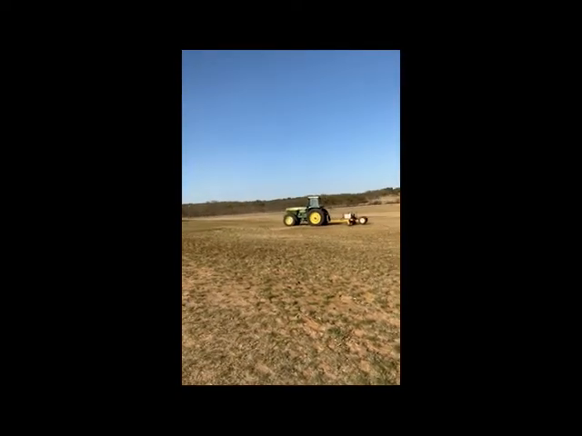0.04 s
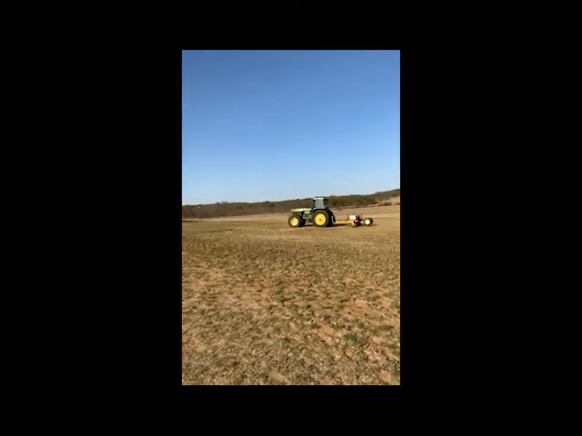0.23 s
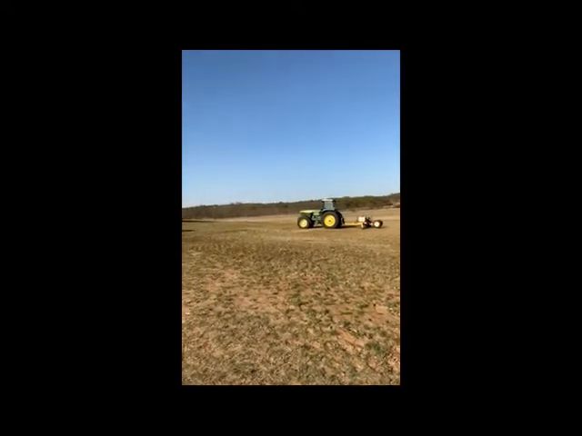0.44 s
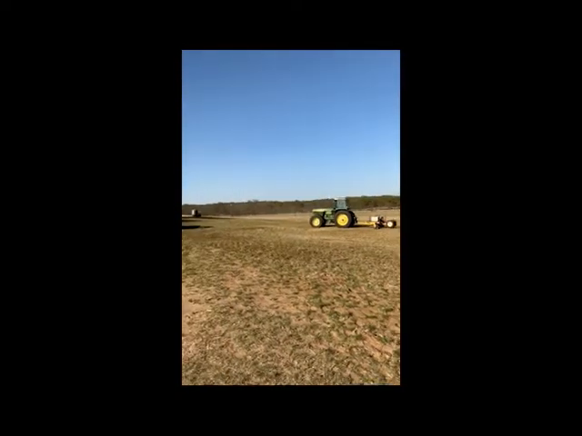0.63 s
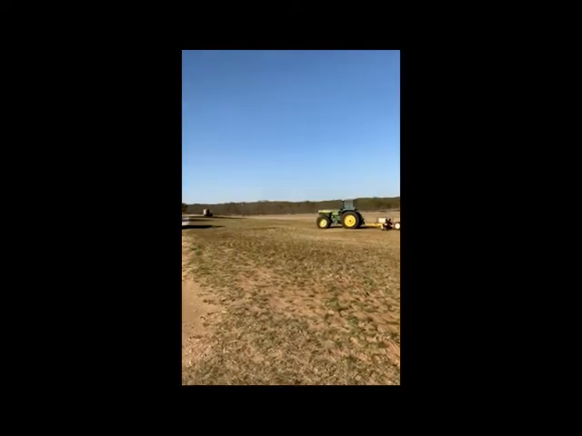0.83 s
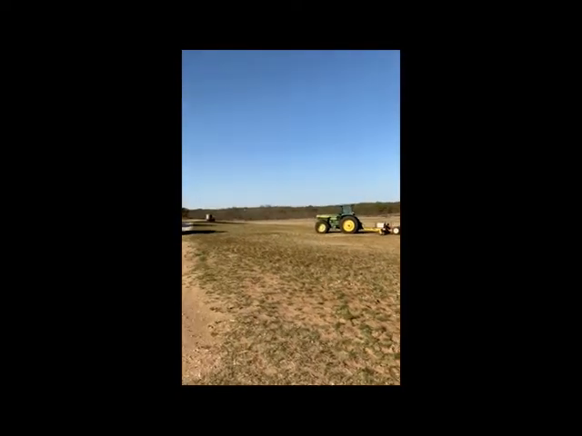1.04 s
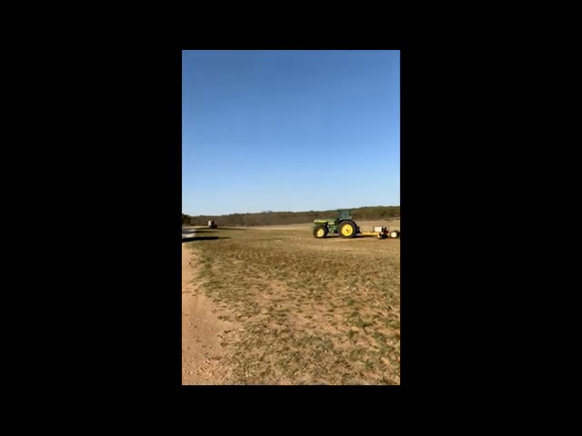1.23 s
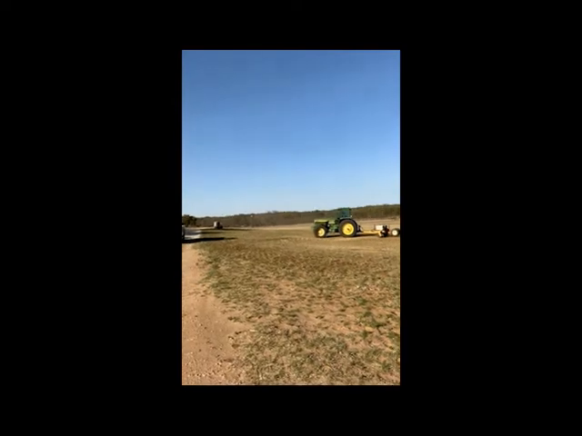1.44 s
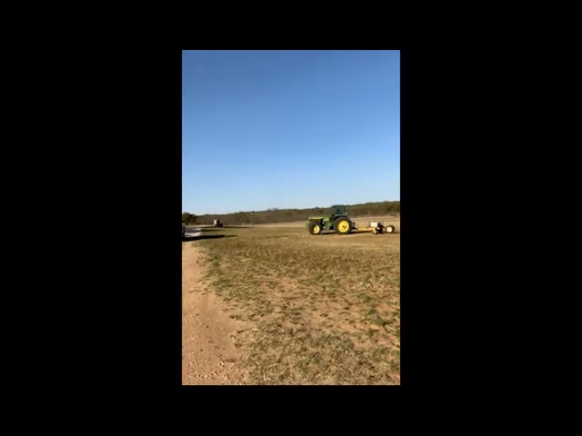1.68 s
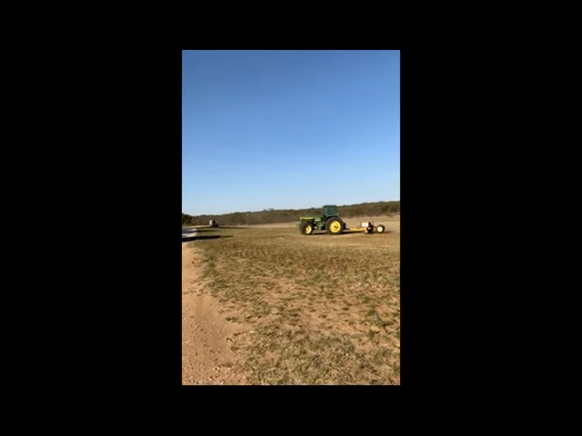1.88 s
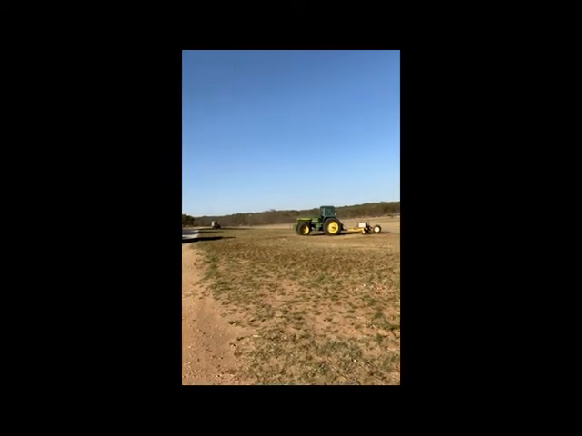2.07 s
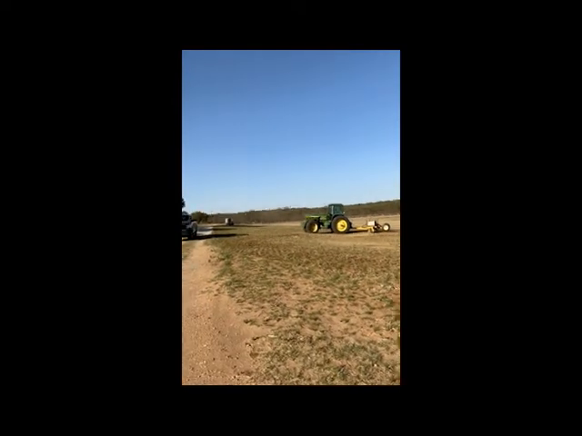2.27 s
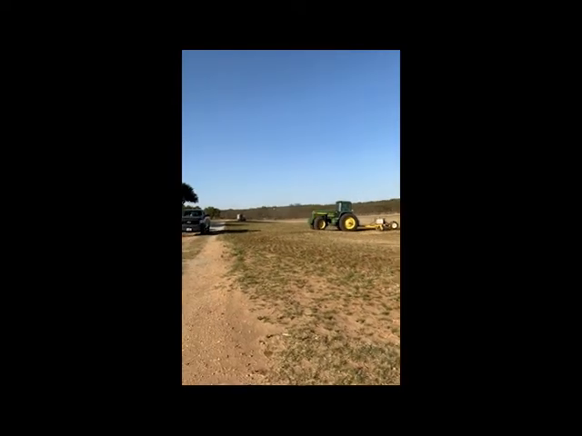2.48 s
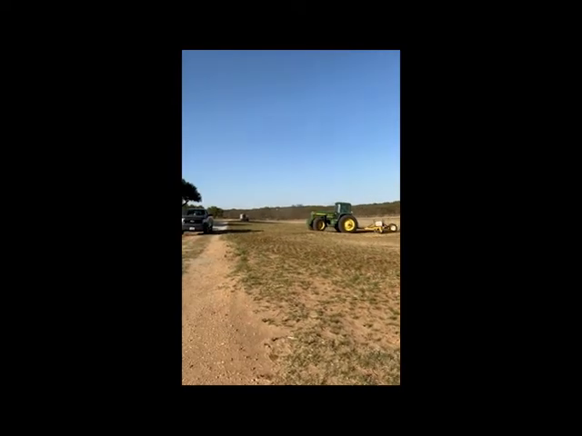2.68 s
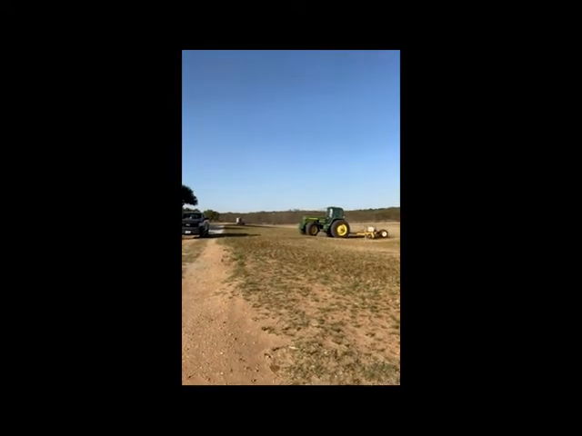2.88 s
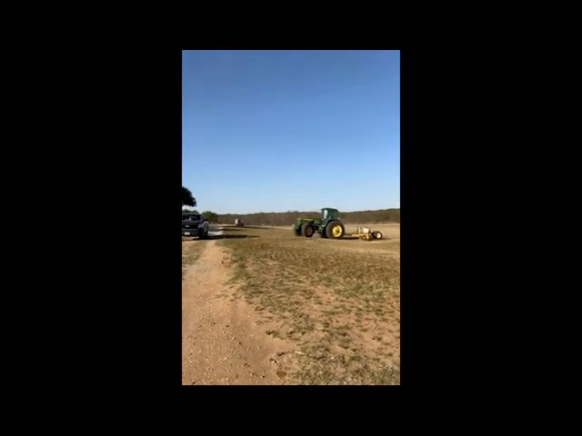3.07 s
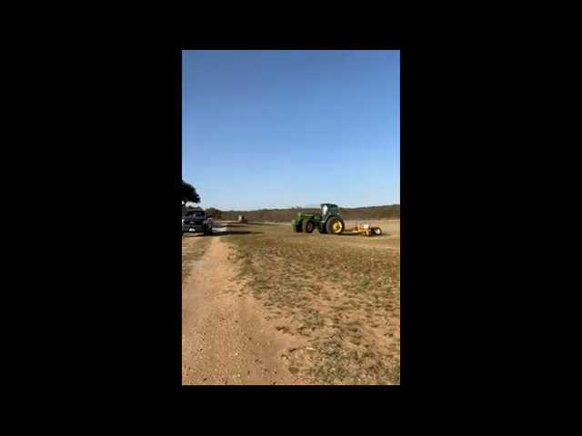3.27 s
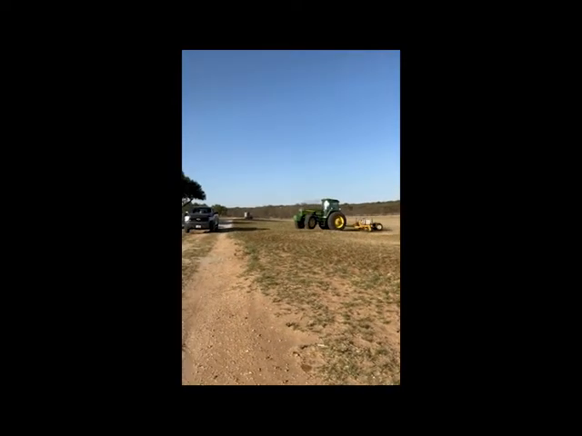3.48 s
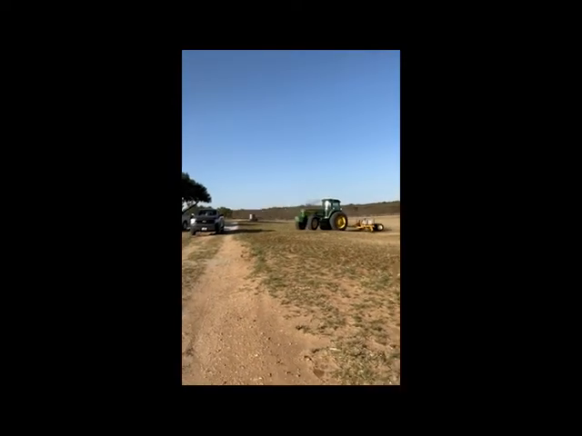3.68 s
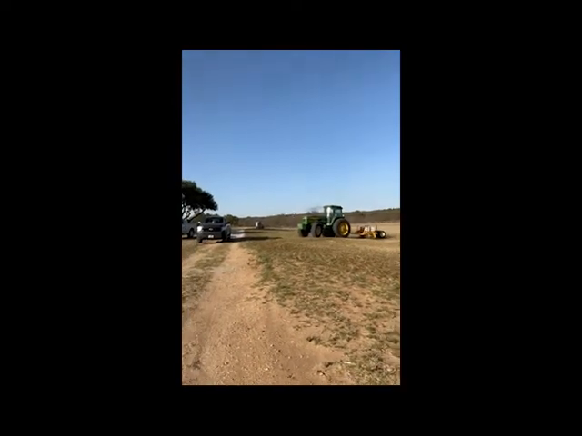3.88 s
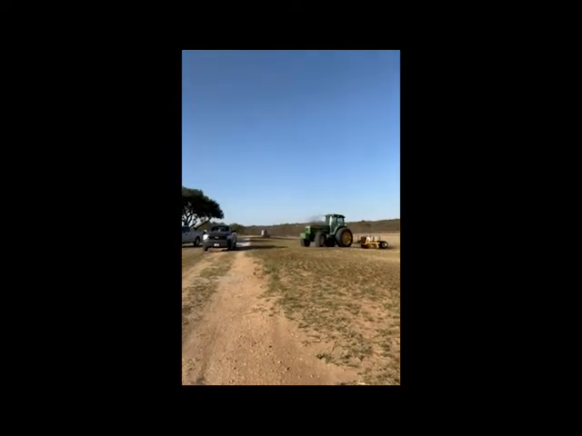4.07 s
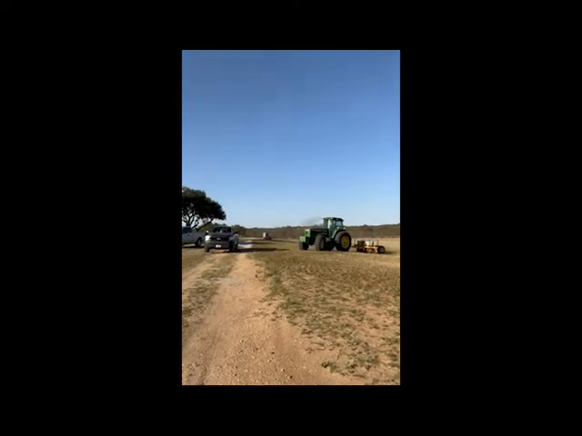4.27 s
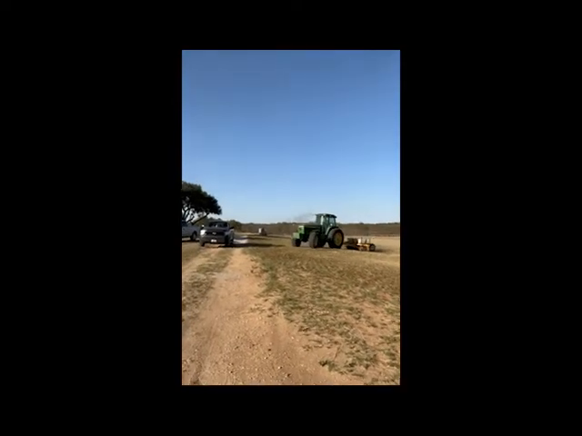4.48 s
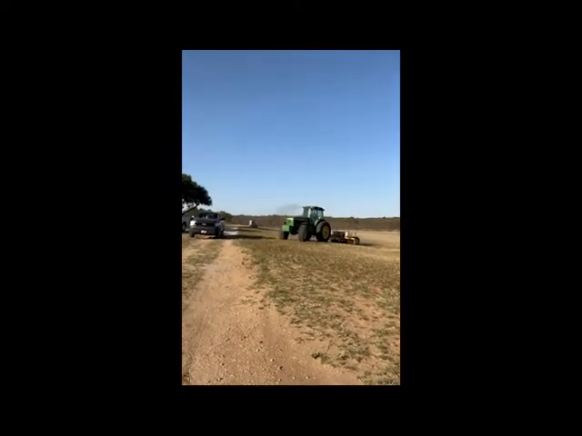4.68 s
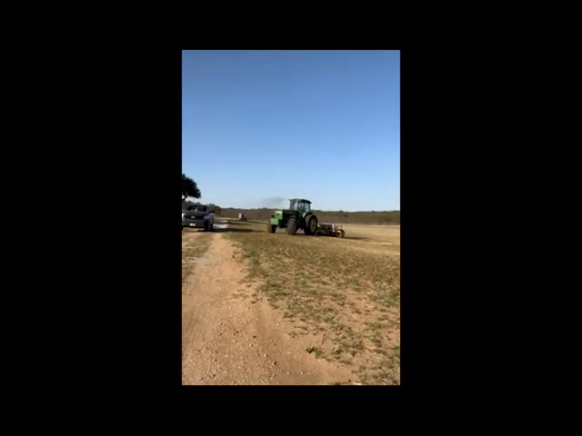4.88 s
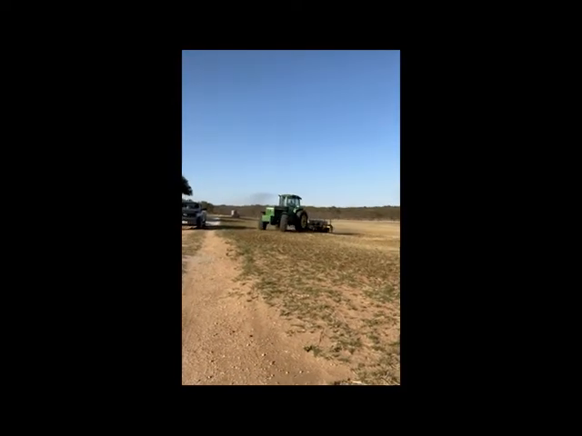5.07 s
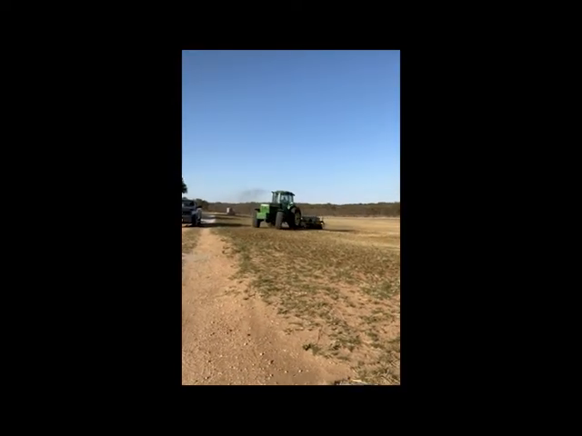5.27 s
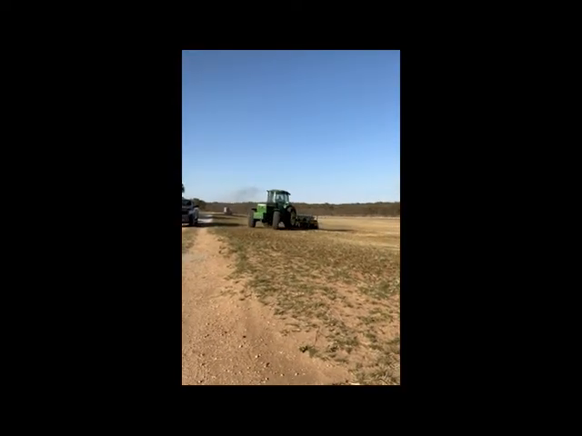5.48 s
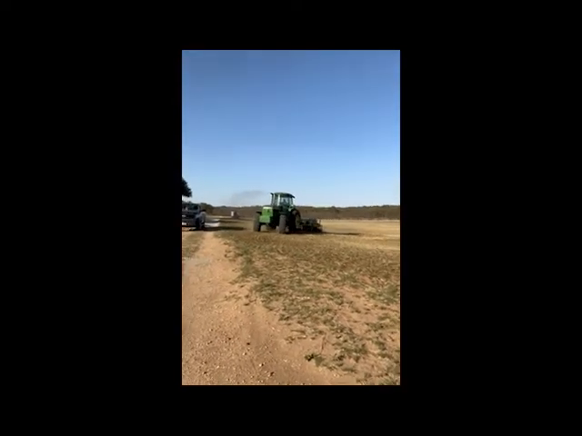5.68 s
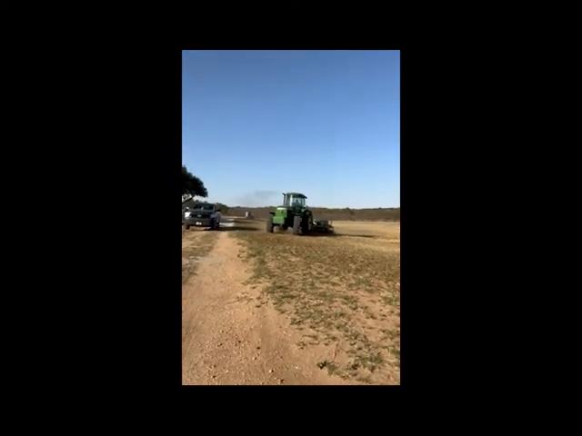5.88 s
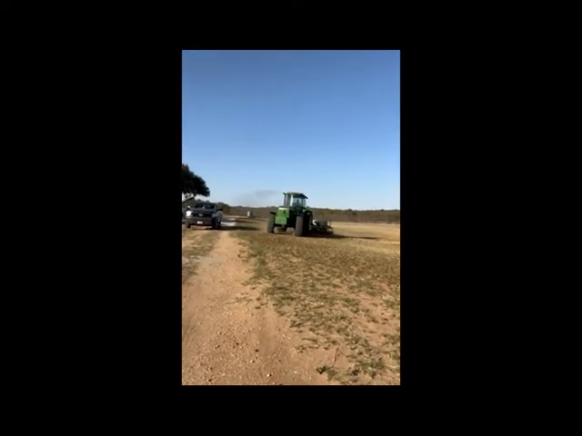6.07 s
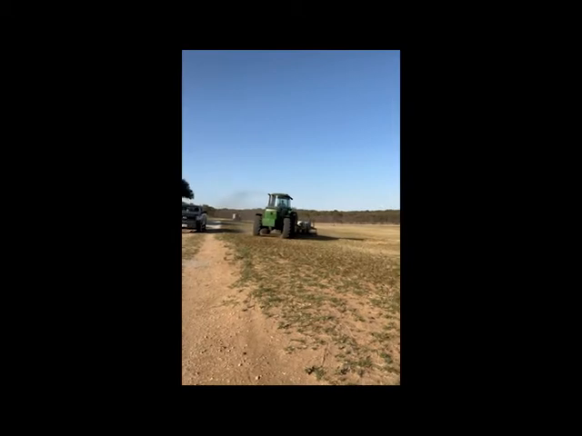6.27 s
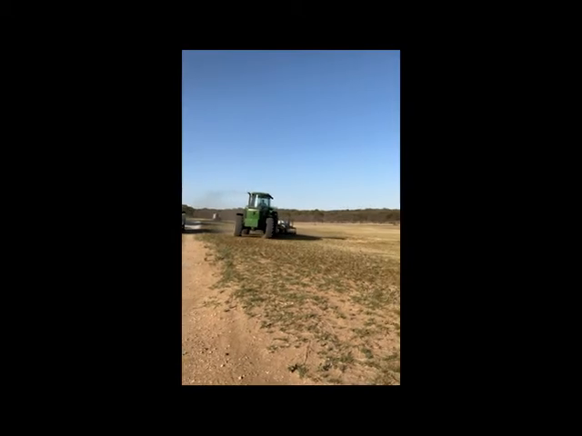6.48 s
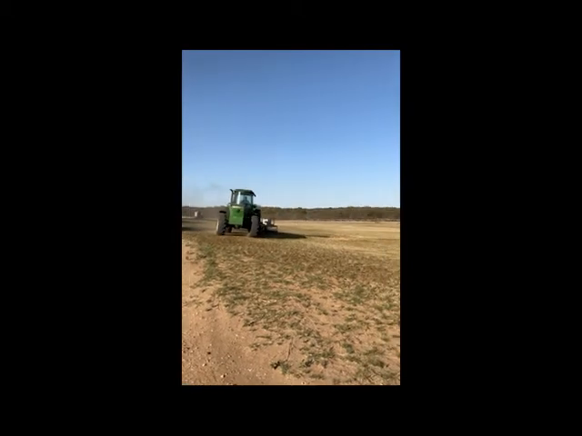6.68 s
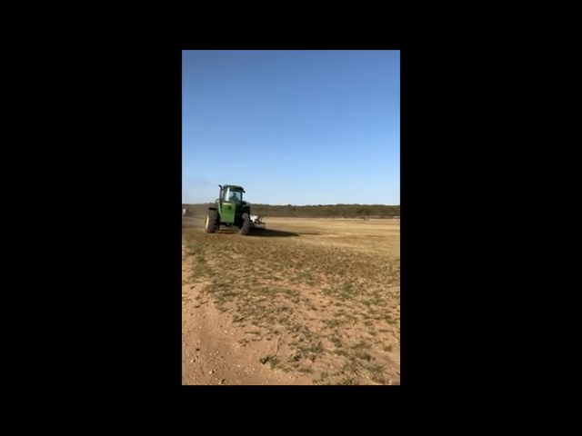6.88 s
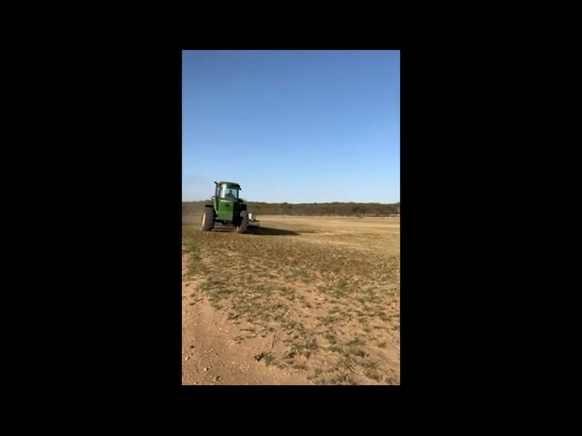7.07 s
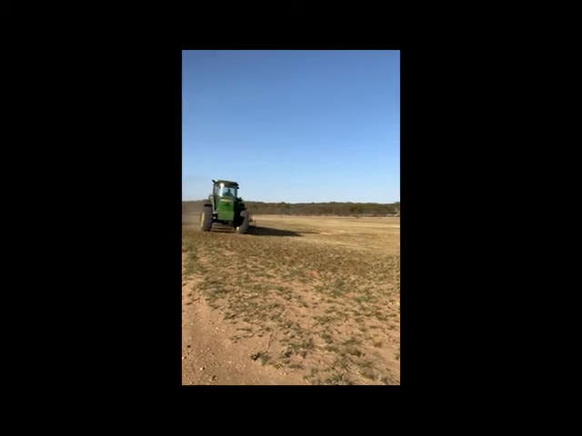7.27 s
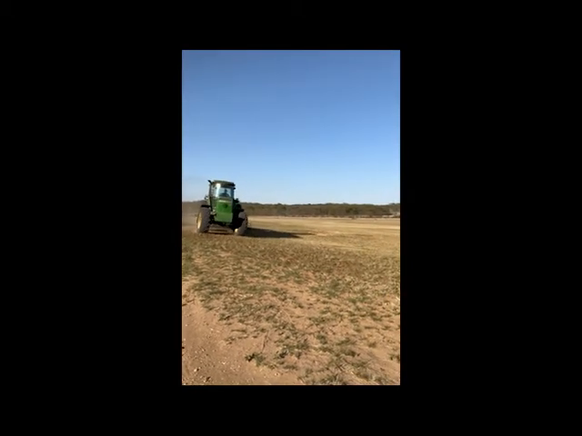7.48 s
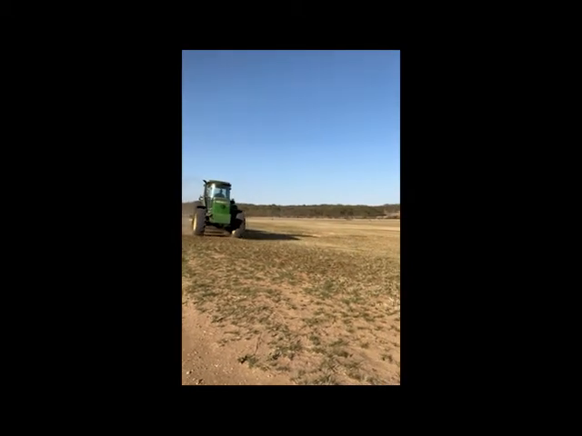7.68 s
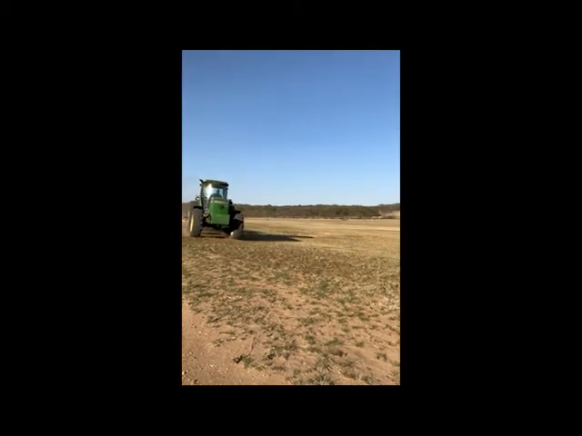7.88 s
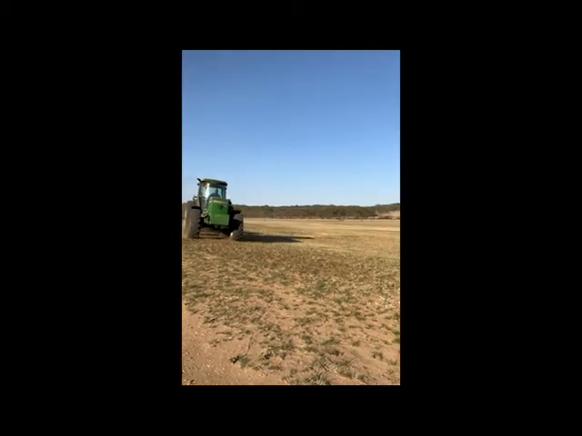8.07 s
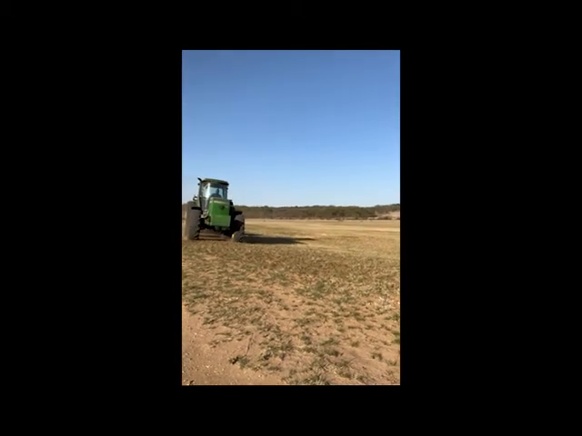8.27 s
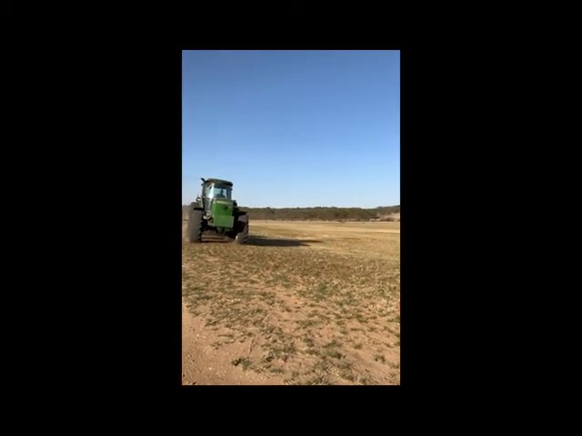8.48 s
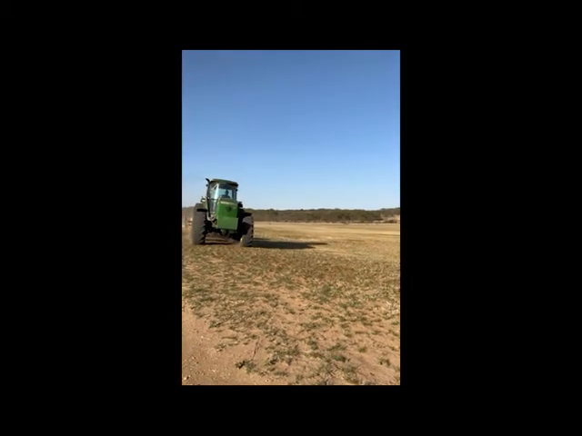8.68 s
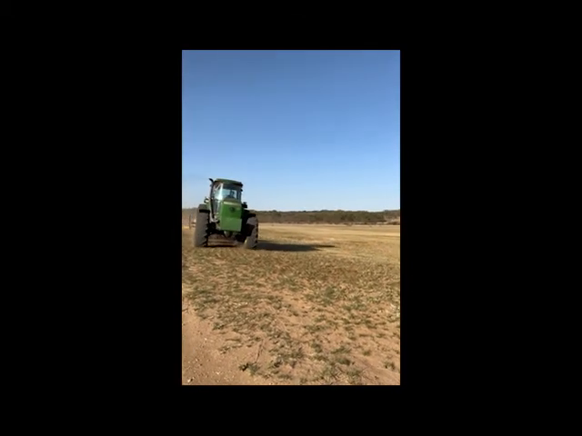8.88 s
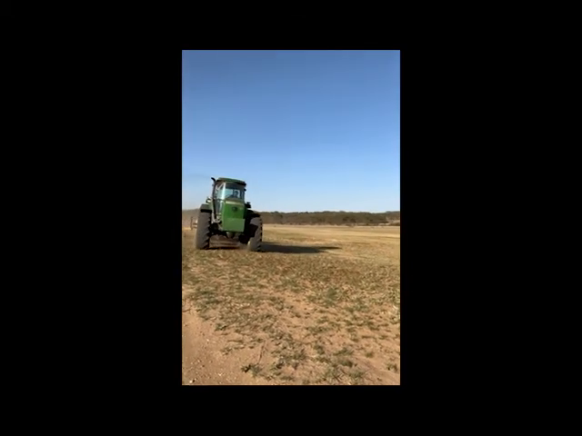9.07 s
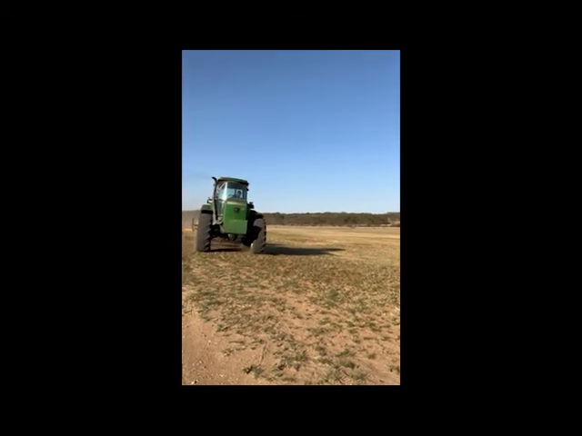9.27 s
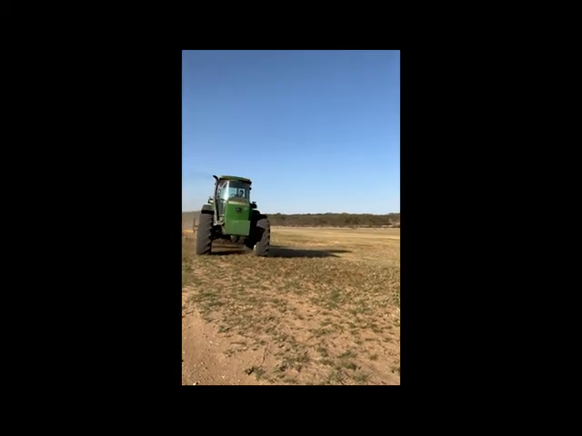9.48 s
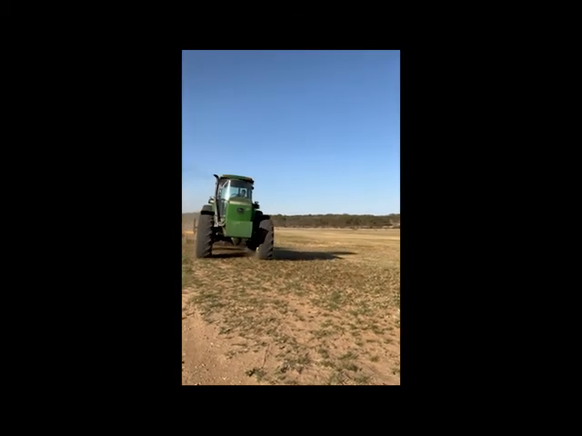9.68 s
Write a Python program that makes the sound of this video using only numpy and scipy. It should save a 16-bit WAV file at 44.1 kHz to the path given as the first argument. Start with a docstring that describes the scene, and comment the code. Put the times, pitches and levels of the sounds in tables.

```python
"""A six-cylinder turbo-diesel tractor tows an aerator over a dry field and comes closer.
Exhaust, fan and turbo are tones locked to or blurred around their rates; combustion noise rings the block.
Injectors and their pump excite brighter resonances, and the bounce off the field cancels narrow bands.
Turbulent wind noise buffets two microphone ports, in phase for gusts and in opposition for eddies.
Damped slaps, small dry ticks and the rattling, clanking steel of the aerator join in later."""
import sys
import numpy as np
from scipy import signal
from scipy.fft import rfft, irfft, next_fast_len
from scipy.io import wavfile
from scipy.ndimage import uniform_filter1d, minimum_filter1d

SR = 44100
rng = np.random.default_rng(int(sys.argv[2]) if len(sys.argv) > 2 else 0)


def persist_wave(psi):
    """Save psi, clipped to +-1, as 16-bit WAV."""
    counts = np.round(np.clip(psi, -1, 1) * 32767).astype(np.int16)
    wavfile.write(sys.argv[1], SR, np.atleast_2d(counts).T)


N = 429093
TIME = np.arange(N) / SR
PADDED = next_fast_len(N + 4096)
BINS = np.maximum(np.arange(PADDED // 2 + 1) * SR / PADDED, 1)   # f/Hz, kept above 0 for the logarithm
# Levels in the tables are relative; the functions add fixed offsets and random wander.


def from_db(db):
    """Level law: amplitude gain grows tenfold per 20 dB."""
    return 10 ** (np.asarray(db) / 20)


def rms_one(x):
    """Normalisation to unit mean power."""
    return x / np.sqrt(np.mean(x ** 2) + 1e-20)


def peak_one(x):
    """Normalisation to unit peak amplitude."""
    return x / np.abs(x).max()


def in_time(rows):
    """Linear interpolation of each column of a curve at every sample."""
    seconds, *columns = np.transpose(rows)
    return [np.interp(TIME, seconds, column) for column in columns]


def at_bins(points):
    """Interpolation of a spectrum over log frequency at every bin."""
    hz, value = np.transpose(points)
    return np.interp(np.log(BINS), np.log(hz), value)


def swell(centre_s, length_s):
    """Gaussian envelope of height 1, with its length taken at half height."""
    return np.exp(-np.minimum(np.log(2) * (2 * (TIME - centre_s) / length_s) ** 2, 50))


def drift(rate):
    """Low-passed random process: a smooth wander with spread 1, cut off near the rate in Hz."""
    steps = TIME * rate * 10
    white = rng.standard_normal(int(steps[-1]) + 102)
    slow = signal.sosfilt(signal.butter(2, .18, output="sos"), white)[100:]
    return rms_one(np.interp(steps, np.arange(len(slow)), slow))


def filtered(x, response):
    """Linear filtering by a frequency response, with the ends of the signal continued smoothly."""
    margin = (PADDED - N) // 2
    extended = np.pad(x, (margin, PADDED - N - margin), "reflect", reflect_type="odd")
    return irfft(rfft(extended) * response, PADDED)[margin:margin + N]


def coloured(x, spectrum):
    """Spectral shaping that falls away steeply above the last point; rms 1."""
    rolloff = np.minimum(spectrum[-1][0] / BINS, 1) ** 2
    response = from_db(at_bins(spectrum)) * rolloff
    return rms_one(irfft(rfft(x, PADDED) * response, PADDED)[:N])


def resonance(x, hz, width_hz):
    """Damped single-mode oscillator: a unit click rings with a height near 1 and dies away."""
    radius = np.exp(-np.pi * width_hz / SR)
    angle = 2 * np.pi * hz / SR
    return signal.lfilter([1, 0, -1], [1, -2 * radius * np.cos(angle), radius * radius], x + 1e-18) / 2


def double_resonance(x, hz, width_hz):
    """Two equal modes in cascade, which select a band with steeper skirts."""
    return resonance(resonance(x, hz, width_hz), hz, width_hz)


def decaying(kicks, decay_s):
    """Exponential relaxation after each kick."""
    return signal.lfilter([1], [1, -np.exp(-1 / (decay_s * SR))], kicks + 1e-18)


def moving_band(x, hz, width_hz):
    """Heterodyne filtering around a moving centre; the width is taken at half amplitude."""
    carrier = np.exp(2j * np.pi * np.cumsum(hz) / SR)
    lowpass = signal.butter(1, width_hz / 2, fs=SR, output="sos")
    baseband = signal.sosfiltfilt(lowpass, x / carrier, padtype="even", padlen=2000)
    return 2 * np.real(carrier * baseband)


def narrow_band(hz, spread_hz):
    """Random modulation that blurs a moving tone by about the spread on either side; rms 1."""
    blur = drift(spread_hz) + 1j * drift(spread_hz)
    return rms_one(np.real(blur * np.exp(2j * np.pi * np.cumsum(hz) / SR)))


# engine speed: t/s, firing rate/Hz
FIRING_RATE = [(0, 84.55), (1.1, 84.55), (1.85, 85.2), (2.2, 84.4), (2.5, 84.6), (2.85, 83.7), (3.5, 84.25),
               (4.15, 83.9), (4.7, 85.1), (5.5, 85.25), (6, 85.9), (7.3, 86.05), (8.05, 86.25),
               (8.95, 85.8), (9.73, 85.3)]


def crank(wobble):
    """Rotation as integrated speed: turns so far at three firings a turn, slightly uneven."""
    firing, = in_time(FIRING_RATE)
    return np.cumsum(firing / 3 * (1 + wobble * drift(8))) / SR


# exhaust firing tone, louder as the tractor nears: t/s, level/dB
EXHAUST_BOOM = [(0, -23), (1.3, -21), (2.3, -22), (3.35, -16.5), (4.4, -16), (6, -13.5), (6.9, -13),
                (8.15, -12), (8.8, -10.5), (9.73, -12)]
OCTAVE_DB, OCTAVE_FOLLOWS = -30.5, 0.5   # second harmonic at mean boom; share of the boom's swing in dB
THIRD_BELOW_DB = 23.5                  # third harmonic under the second


def exhaust(turns):
    """Harmonic series of a pulsed source: the stack sounds the firing rate and its next two multiples."""
    first_db, = in_time(EXHAUST_BOOM)
    second_db = OCTAVE_DB + OCTAVE_FOLLOWS * (first_db - first_db.mean())
    angle = 6 * np.pi * turns
    first = from_db(first_db - 0.45 + 1.1 * drift(6.5)) * np.sin(angle)
    second = from_db(second_db + 1.3 * drift(3.6)) * np.sin(2 * angle)
    third = from_db(second_db - THIRD_BELOW_DB + 3.9 * drift(5.1)) * np.sin(3 * angle)
    return np.sqrt(2) * (first + second + third)


# cooling fan blade tone: t/s, level/dB
FAN_TONE = [(0, -43.5), (.7, -38.5), (2.1, -45), (3.2, -37.5), (5, -39.5), (5.8, -37), (9.73, -32.5)]


def fan(turns):
    """Blade-passing tone: the belt-driven fan sounds at a fixed ratio to crank speed."""
    blade_passes = 9.36 * turns
    level_db, = in_time(FAN_TONE)
    return np.sqrt(2) * from_db(level_db + 2.24 * drift(2.3)) * np.sin(2 * np.pi * blade_passes)


def repeating(cycles, size):
    """Cyclic noise: a random rattle returns on every cycle and slowly changes as the tractor turns."""
    weights = np.array([drift(.6) for _ in range(3)])
    place = cycles % 1 * size
    rattles = [np.interp(place, np.arange(size), rng.standard_normal(size)) for _ in weights]
    return rms_one((weights * rattles).sum(axis=0) / np.linalg.norm(weights, axis=0))


# strength of each cylinder, in firing order: level/dB
CYLINDER_STRENGTH = [-3, -5, -2.2, -3, -3, -1.3]


def combustion(turns, alike, snap, sharpness, uneven):
    """Pulse-modulated noise: a burst per firing over churning, partly cyclic and partly fresh."""
    firings = 3 * turns
    number = firings.astype(int)
    cylinder_db = np.array(CYLINDER_STRENGTH)[number % len(CYLINDER_STRENGTH)]
    strength_db = uneven * cylinder_db + 2 * rng.standard_normal(N)[number]
    burst = 1 + snap * from_db(strength_db) * np.exp(-sharpness * (firings % 1))
    # one pattern per turn, one per four-stroke cycle
    locked = rms_one(repeating(turns, size=1500) + 0.93 * repeating(turns / 2, size=3000))
    alike = np.clip(alike, 0, 1)
    return burst * (np.sqrt(alike) * locked + np.sqrt(1 - alike) * rng.standard_normal(N))


# radiation toward the listener: t/s, block knock level/dB, injector clatter level/dB
ENGINE_LEVELS = [(0, -31.5, -38.5), (1.8, -36.5, -38), (2.35, -33.5, -35), (2.8, -36.5, -37.5),
                 (4.6, -32.5, -37), (5.1, -32, -41), (5.95, -29.5, -36.5), (6.5, -31, -38.5),
                 (7.2, -33, -42), (8.5, -30.5, -41.5), (9.35, -26, -40), (9.73, -26.5, -40)]
# droning panels as the tractor turns: t/s, hood level/dB, cab level/dB, cab f/Hz
PANEL_DRONES = [(0, -26.5, -60, 600), (.9, -31.5, -51, 614), (1.5, -69, -47.5, 597), (2.4, -39, -40.5, 565),
                (3.3, -50, -38.5, 596), (4.5, -62, -41.5, 620), (4.9, -58, -43, 620), (6, -50, -44.5, 628),
                (9.73, -49.5, -40, 638)]
# crank orders ringing out of the block: t/s at the height, length/s, multiple of crank speed, level/dB
CRANK_ORDERS = [(.5, 1, 39, -50), (.5, 1.2, 40, -56), (.5, 1.3, 33, -46), (.5, 0.84, 46.5, -45),
                (1.1, 2.7, 36, -43.5), (1.8, 1.3, 21, -44.5), (2.4, 0.57, 20, -47), (3.304, 1.2, 22.5, -44),
                (2.4, 0.45, 40.5, -43), (1.9, 1.7, 44, -47), (3.3, 2.1, 43, -43), (4.402, 1.3, 23, -54),
                (4.7, 1.8, 44, -39.5), (4.8, 0.75, 40.5, -36.5), (5.301, 1.5, 46.5, -43),
                (6.1, 1.2, 36, -50), (6.302, 0.88, 37.5, -47), (6.6, 1.2, 43.5, -42.5),
                (8.2, 0.75, 46.5, -43), (8.3, 2.4, 39, -38), (8.301, 1.6, 52.5, -44), (8.6, 2, 44, -44)]
# relative spectrum of the knock: f/Hz, level/dB
KNOCK_SPECTRUM = [(60, -14), (130, -5.5), (230, 0.5), (330, -5.5), (480, -7), (750, -9.5), (950, -1.5),
                  (1170, 3), (1380, 2), (1550, -5.5), (1720, -23), (2100, -23), (3000, -37.5)]
CAB_WIDTH_HZ = 100


def block(turns):
    """Forced vibration: combustion knocks the block, rings its crank orders and drones hood and cab."""
    knock_db, _ = in_time(ENGINE_LEVELS)
    hood_db, cab_db, cab_hz = in_time(PANEL_DRONES)
    blows = combustion(turns, alike=.76, snap=1.35, sharpness=3.2, uneven=1.3)
    ringing = 0
    for s, length, order, db in CRANK_ORDERS:
        half_orders = round(2 * order)   # a four-stroke cycle takes two turns
        tone = np.sin(np.pi * (half_orders * turns + 2 * rng.random()))
        ringing = ringing + from_db(db) * swell(s, length) * tone
    knock = from_db(knock_db + 1.45) * coloured(blows, KNOCK_SPECTRUM)
    orders = from_db(1.5 + 2.1 * drift(4.5)) * ringing
    hood = from_db(hood_db - 9.5) * rms_one(double_resonance(blows, 1105, 170))
    shaking = combustion(turns, alike=.93, snap=1, sharpness=3, uneven=1)
    cab = from_db(cab_db - 1.0) * rms_one(moving_band(shaking, cab_hz, CAB_WIDTH_HZ))
    return knock + orders + hood + cab


# resonances of the injector pump: f/Hz, width/Hz, level/dB
PUMP_RESONANCES = [(4680, 300, 4.5), (6100, 340, 0.5), (2570, 70, -5.5)]
PUMP_LAG, PUMP_DECAY_S = 0.31, 0.0031   # firings by which a stroke follows the burst; scrape decay


def pump(turns, scatter_db):
    """Impact excitation: on every second firing the pump's modes give a short metallic ping; rms 1."""
    strokes = np.diff(np.floor((3 * turns - PUMP_LAG) / 2), prepend=0) > 0
    kicks = strokes * from_db(scatter_db * rng.standard_normal(N))
    scrape = decaying(kicks, PUMP_DECAY_S) * rng.standard_normal(N)
    pings = sum(from_db(db) * resonance(scrape, hz, width) for hz, width, db in PUMP_RESONANCES)
    return rms_one(signal.sosfilt(signal.butter(4, 6800, fs=SR, output="sos"), pings))


# relative spectrum of the injector taps: f/Hz, level/dB
CLATTER_SPECTRUM = [(1400, -7), (1800, -7.5), (2100, -1.5), (2350, -5.5), (2700, 3), (2950, 1),
                    (3250, -10.5), (3800, -19.5)]
# relative spectrum of the bright rush: f/Hz, level/dB
RUSH_SPECTRUM = [(2800, -28.5), (3300, -4), (3700, 0), (4300, -0.5), (4750, -2), (5300, -3), (6200, -6),
                 (7400, -13.5), (8600, -24.5), (10500, -20), (12500, -24), (14500, -31), (16000, -46.5)]
# treble: t/s, level/dB
TREBLE_LEVEL = [(0, -37.5), (.35, -40.5), (.76, -37.5), (1.1, -41.5), (1.85, -43), (2.08, -37), (2.35, -34),
                (2.73, -42.5), (3, -35.5), (3.42, -38.5), (3.64, -32.5), (3.77, -38.5), (3.98, -34.5),
                (4.23, -43), (4.36, -34.5), (4.9, -38.5), (5.85, -39.5), (6.9, -41.5), (9.73, -39)]
# metallic ring, shifting with the tractor's angle: t/s, f/Hz, level/dB
METAL_RING = [(0, 2320, -51), (.45, 2340, -49), (.62, 2310, -38.5), (.8, 2310, -48), (.97, 2370, -41.5),
              (1.12, 2400, -53), (1.4, 2450, -48), (1.57, 2480, -45), (1.8, 2490, -53), (2.3, 2500, -48),
              (2.55, 2500, -46), (2.72, 2510, -48), (2.95, 2540, -48), (3.35, 2440, -53), (3.9, 2460, -45),
              (4.6, 2480, -47.5), (5, 2490, -51), (5.3, 2330, -47), (7.2, 2306, -50), (8.3, 2385, -45.5),
              (9.73, 2320, -47.5)]
# further rings that come and go: t/s at the height, length/s, f/Hz, level/dB
PASSING_RINGS = [(.7, 0.38, 2640, -42), (4.35, .8, 2610, -45.5), (5.8, 0.66, 2670, -45),
                 (5.797, 0.55, 1920, -44)]
# pump on the flank, which turns away as the tractor comes head-on: t/s, level/dB against the treble
PUMP_LEVEL = [(0, -2), (2.6, -1), (3.6, -7), (6, -8), (7.2, -13)]
RING_WIDTH_HZ = 170


def injectors(turns):
    """Pulsed excitation of bright modes: clatter, pings and rush; moving air makes them shimmer."""
    _, clatter_db = in_time(ENGINE_LEVELS)
    treble_db, = in_time(TREBLE_LEVEL)
    ring_hz, ring_db = in_time(METAL_RING)
    pump_db, = in_time(PUMP_LEVEL)
    taps = combustion(turns, alike=.55, snap=1.35, sharpness=4, uneven=2)
    puffs = combustion(turns, alike=.3, snap=.8, sharpness=4.5, uneven=2.8)
    clatter = from_db(clatter_db - 0.46 + 1.1 * drift(12)) * coloured(taps, CLATTER_SPECTRUM)
    ring_gain = from_db(ring_db + 5.0 + 1.4 * drift(6))
    ring = ring_gain * rms_one(moving_band(puffs, ring_hz, RING_WIDTH_HZ))
    passing = sum(from_db(db) * swell(s, length) * rms_one(double_resonance(puffs, hz, 220))
                  for s, length, hz, db in PASSING_RINGS)
    pings = from_db(pump_db) * pump(turns, scatter_db=2.0)
    treble_gain = from_db(treble_db - 0.44 + 0.99 * drift(15))
    bright = treble_gain * (coloured(puffs, RUSH_SPECTRUM) + pings)
    return clatter + ring + passing + bright


# turbo whistle: t/s, f/Hz, level/dB
TURBO_WHISTLE = [(0, 11350, -63), (1.1, 11870, -68), (2, 11580, -64), (2.75, 12100, -64), (3.1, 12540, -57),
                 (3.5, 12720, -53.5), (3.8, 13100, -53.5), (4.28, 12950, -59), (4.41, 13100, -48),
                 (4.55, 12930, -55), (4.9, 12600, -51.5), (5.3, 12400, -57), (6.1, 11860, -61),
                 (6.9, 10870, -69), (8.3, 10560, -57.5), (9.73, 10950, -60.5)]


def turbo(turns, spread_hz, skirt_hz, skirt_db):
    """Blade tone blurred by turbulent intake air, its level throbbing at half the firing rate."""
    hz, level_db = in_time(TURBO_WHISTLE)
    whistle = narrow_band(hz, spread_hz) + from_db(skirt_db) * narrow_band(hz, skirt_hz)
    throb = np.sin(3 * np.pi * turns)
    return from_db(level_db + 3.1 * drift(18) + 3.8 * throb) * rms_one(whistle)


LUMPS_PER_S, LUMP_DECAY_S = 55, 0.0096   # surges within the wind's rush


def lumpiness(depth):
    """Intermittency of turbulence: random surges start at once, relax and saturate."""
    kicks = (rng.random(N) < LUMPS_PER_S / SR) * rng.uniform(.3, 1, N)
    return 1 + depth * np.tanh(decaying(kicks, LUMP_DECAY_S))


RUSH_FOLLOWS = 0.43   # share of a puff's swing in dB that reaches the rush


def buffeting(flow, puffs, rumble, rush, rumble_db, rush_db, lumpy):
    """Turbulent pressure at the ports: low churn under a lumpy rush; each puff lifts both."""
    low_db, high_db = in_time(flow)
    puff_db = sum(db * swell(s, length) for s, length, db in puffs)
    churn = coloured(rng.standard_normal(N), rumble)
    churn = churn / np.sqrt(uniform_filter1d(churn ** 2, size=3500) + 1e-6)   # even out its level
    lumps = coloured(lumpiness(lumpy) * rng.standard_normal(N), rush)
    low = from_db(low_db + rumble_db + puff_db) * churn
    high = from_db(high_db + rush_db + RUSH_FOLLOWS * puff_db) * lumps
    return low + high


# freshening breeze: t/s, rumble level/dB, rush level/dB
BREEZE_FLOW = [(0, -36.5, -51), (1.7, -36, -45.5), (3.1, -34.5, -43), (4.03, -35, -36.5),
               (4.18, -32.5, -39), (4.25, -40, -33), (4.33, -33.5, -34), (4.44, -32.5, -39.5),
               (5.3, -35.5, -39.5), (6, -31, -32), (6.25, -23.5, -28), (7, -26, -31.5), (7.55, -26.5, -29),
               (8.2, -27, -28), (8.95, -26.5, -27), (9.73, -26, -32.5)]
# gusts across both ports: t/s at the height, length/s, rumble level/dB above the breeze
GUST_PUFFS = [(0.1, 0.088, 0), (0.29, 0.22, 3.5), (0.586, 0.1, 6), (0.726, 0.069, 6.5), (1.319, 0.048, 7),
              (1.422, 0.043, 10), (1.67, 0.22, 2.5), (1.914, 0.16, 8.5), (2.176, 0.085, 4.5),
              (2.36, 0.074, 8), (2.693, 0.094, 10.5), (3.045, 0.19, 2.5), (3.798, 0.11, 6.5),
              (4.164, 0.1, 7.5), (4.353, 0.13, 9.5), (4.674, 0.13, 2), (5.128, .16, 4.5),
              (5.582, 0.22, 12.5), (6.162, 0.054, 7), (6.375, 0.14, 2), (6.7, 0.1, 6), (7.085, 0.17, 2.5),
              (7.478, 0.17, 0), (8.205, 0.067, 5), (8.48, 0.17, 7.5), (8.892, 0.26, 8.5),
              (9.195, 0.13, 4.5), (9.409, 0.037, 10)]
# relative spectrum of the gusts' churn: f/Hz, level/dB
GUST_LOW_SPECTRUM = [(12, -33.5), (22, -33.5), (35, -2), (55, 10.5), (80, 8), (130, 3.5), (200, -0.5),
                     (300, -9.5), (500, -63)]
# relative spectrum of the gusts' rush: f/Hz, level/dB
GUST_HIGH_SPECTRUM = [(170, -11), (290, -1.5), (420, -6), (650, -9), (950, -16.5), (1500, -26.5),
                      (3000, -43.5), (6000, -77.5)]


def breeze():
    """In-phase turbulent pressure: gusts across both ports press them alike."""
    return buffeting(BREEZE_FLOW, GUST_PUFFS, GUST_LOW_SPECTRUM, GUST_HIGH_SPECTRUM,
                     rumble_db=5.0, rush_db=1.5, lumpy=2.8)


# bands cancelled by the bounce: start t/s, end t/s, start f/Hz, end f/Hz, depth 0-1, width/Hz
BOUNCE_DIPS = [(0.38, 1.54, 2330, 2100, 0.9, 96), (.7, 0.82, 2630, 2520, 0.9, 110),
               (0.55, 6.7, 1730, 2200, 0.5, 110), (2.08, 3.35, 2190, 2200, 0.65, 180),
               (2.48, 2.88, 2380, 2700, 0.7, 200), (2.2, 3.8, 1460, 1330, .45, 63),
               (3.85, 4.75, 2000, 2080, 0.74, 340), (4.9, 6.4, 2030, 2200, 0.8, 140),
               (4.65, 5.8, 1440, 1400, 0.7, 150), (1.7, 6.1, 3290, 3330, 0.65, 220),
               (6.5, 15, 3480, 3840, 0.52, 650)]


def ground_echo(x):
    """Destructive interference: the bounce off the field cancels bands that glide as the tractor moves."""
    for start, end, from_hz, to_hz, depth, width_hz in BOUNCE_DIPS:
        present = np.clip(np.minimum(TIME - start, end - TIME) / 0.15, 0, 1)
        centre_hz = np.interp(TIME, [start, end], [from_hz, to_hz])
        x = x - min(depth, 1) * present * moving_band(x, centre_hz, width_hz)
    return x


# swirl that pushes the ports in opposite directions: t/s, rumble level/dB, rush level/dB
SWIRL_FLOW = [(0, -64, -58), (.55, -43.5, -55), (2.1, -44.5, -52), (3, -40, -47.5), (3.8, -31, -42),
              (4.1, -45, -50.5), (5.9, -40.5, -46.5), (6.45, -35, -33.5), (7.2, -34, -35.5),
              (7.6, -28.5, -32), (8.5, -34, -30.5), (9.05, -22.5, -23.5), (9.73, -25, -22.5)]
# single eddies: t/s at the height, length/s, rumble level/dB above the swirl
EDDY_PUFFS = [(.57, .15, 5), (1.12, 0.061, 11), (1.5, .14, 14), (2.294, 0.069, 15), (2.63, .12, 11),
              (2.812, 0.097, 18), (2.994, 0.14, 17), (3.32, 0.08, 11), (3.538, 0.11, 8), (3.752, .16, 10),
              (4.3, 0.11, 11), (4.632, 0.13, 15), (4.885, 0.09, 9), (5.064, 0.065, 14), (5.448, 0.084, 2),
              (5.65, 0.13, 5), (6.192, 0.19, 10), (6.582, 0.18, 19.5), (6.87, .12, 11)]
# relative spectrum of the eddies' churn: f/Hz, level/dB
EDDY_LOW_SPECTRUM = [(12, -37), (30, -25), (55, 1), (80, 7.5), (170, 3.5), (250, -2.5), (400, -32),
                     (700, -77)]
# relative spectrum of the eddies' rush: f/Hz, level/dB
EDDY_HIGH_SPECTRUM = [(170, -6.5), (290, 1.5), (450, -2.5), (750, -7.5), (1100, -17), (1600, -20),
                      (4000, -32.5)]


def swirl():
    """Antiphase turbulent pressure: eddies push the two ports with opposite sign."""
    pressure = buffeting(SWIRL_FLOW, EDDY_PUFFS, EDDY_LOW_SPECTRUM, EDDY_HIGH_SPECTRUM,
                         rumble_db=-1.0, rush_db=1.6, lumpy=2.8)
    return pressure * np.array([[1], [-1]])


# sharp slaps of wind: t/s, peak level/dB, f/Hz
WIND_SLAPS = [(5.605, -14.5, 382), (5.898, -18, 400), (6.143, -10.5, 250), (6.16, -10, 280),
              (6.657, -18.5, 350), (6.675, -9.5, 198), (6.745, -10, 308), (7.028, -15, 240),
              (7.14, -16, 374), (7.438, -17, 330), (7.839, -13, 480), (7.888, -13, 496),
              (8.184, -12.5, 257), (8.5, -5, 190), (8.76, -14, 330), (8.899, -6.5, 330), (9.173, -15, 450)]
SLAP_DAMPING = 0.73   # width of each cascaded mode as a share of its pitch


def slaps():
    """Impulse response of heavily damped modes: a small eddy breaks on the ports in one thud."""
    out = np.zeros(N + SR)
    kick = signal.unit_impulse(SR // 20)
    for s, db, hz in WIND_SLAPS:
        thud = double_resonance(kick, hz, SLAP_DAMPING * hz)
        start = round(s * SR)
        out[start:start + len(thud)] += from_db(db + 0.7) * peak_one(thud)
    return out[:N]


# band of the brief dip: f/Hz, level/dB of the part taken away
HOLLOW_SPECTRUM = [(100, -25), (160, -2), (500, 0), (850, -1), (1200, -30)]
HOLLOW_AT_S, HOLLOW_S, HOLLOW_SHARE = 6.595, 0.19, .86   # when deepest, how long, how deep


def hollowed(x):
    """Time-varying band subtraction: the low middle of the sound dips briefly."""
    low_middle = filtered(x, from_db(at_bins(HOLLOW_SPECTRUM)))
    return x - np.clip(HOLLOW_SHARE, 0, 1) * swell(HOLLOW_AT_S, HOLLOW_S) * low_middle


def burst(start, decay_s):
    """Exponentially decaying noise: a short crackle from its start onward."""
    age = TIME - start
    return (age >= 0) * np.exp(-np.clip(age / decay_s, 0, 50)) * rng.standard_normal(N)


# small ticks: t/s, peak level/dB, f/Hz
SMALL_TICKS = [(6.615, -41, 8450), (6.795, -39, 7950), (8.3085, -20.5, 5800), (8.55, -35, 8500),
               (9.189, -28, 6840), (9.6263, -26.5, 6060), (9.622, -20, 3050)]


def ticks():
    """Transient excitation of a broad mode: dry, bright ticks close by."""
    dull = signal.butter(2, 10000, fs=SR, output="sos")
    out = 0
    for s, db, hz in SMALL_TICKS:
        tick = resonance(burst(s, 0.0026), hz, 1900)
        out = out + from_db(db) * peak_one(signal.sosfilt(dull, tick))
    return out


# modes of the aerator's rattle: f/Hz, width/Hz of each cascaded mode, level/dB
RATTLE_RESONANCES = [(840, 390, -27), (2030, 940, -45.5)]
RATTLE_AT_S, RATTLE_S, RATTLES_PER_S = 9.07, 0.89, 140   # when loudest, length at half height, density


def rattle():
    """Random impact train: loose steel on the aerator chatters densely through its damped modes."""
    hits = (rng.random(N) < RATTLES_PER_S / SR) * rng.uniform(.3, 1, N)
    scrape = decaying(hits, .004)
    chatter = 0
    for hz, width, db in RATTLE_RESONANCES:
        ringing = double_resonance(scrape * rng.standard_normal(N), hz, width)
        chatter = chatter + from_db(db) * rms_one(ringing)
    return swell(RATTLE_AT_S, RATTLE_S) * chatter


# aerator clanks: t/s, peak level/dB, f/Hz, width/Hz of each cascaded mode, contact length/s
AERATOR_CLANKS = [(9.071, -15, 870, 350, 0.012), (9.139, -17, 940, 500, .012),
                  (9.174, -19, 1900, 1200, 0.0088), (9.2086, -23, 2000, 1200, .003),
                  (9.262, -16.5, 2090, 450, 0.0064), (9.37, -14, 900, 500, 0.01),
                  (9.392, -25, 1900, 900, .008), (9.409, -13, 1030, 600, 0.013),
                  (9.418, -24, 2000, 900, .02)]


def clanks():
    """Contact-excited modes: steel parts of the aerator knock and chatter, well damped by the soil."""
    out = 0
    for s, db, hz, width, length in AERATOR_CLANKS:
        contact = swell(s, length) * rng.standard_normal(N)
        out = out + from_db(db) * peak_one(double_resonance(contact, hz, width))
    return out


# phase lead of the left port: f/Hz, phase/rad
PORT_LEAD = [(100, 0), (1200, .08), (1600, .3), (1950, -.7), (2300, .4), (2750, 1.2), (3100, .9), (3500, 0),
             (5000, .6), (6300, 1.35), (7500, 1.95), (8400, 2.8), (9800, 3.35), (11000, 4.2), (13000, 5.6),
             (16000, 6.1)]


def scene():
    """Superposition: the tractor reaches two ports with a phase difference; wind acts on the ports."""
    turns = crank(wobble=.001)
    tractor = exhaust(turns) + fan(turns) + block(turns) + injectors(turns) + rattle() + clanks()
    tractor = ground_echo(tractor)
    tractor = hollowed(tractor + turbo(turns, spread_hz=170, skirt_hz=700, skirt_db=-10.5))
    half_lead = np.exp(.5j * at_bins(PORT_LEAD))
    ports = np.array([filtered(tractor, half_lead), filtered(tractor, half_lead.conj())])
    return ports + hollowed(breeze()) + slaps() + swirl() + ticks()


CUTOFF_HZ = 15300


def record(dry):
    """Band limiting and peak limiting: deepest rumble and top are cut, peaks held, ends eased."""
    thinned = signal.sosfilt(signal.butter(2, 20, "high", fs=SR, output="sos"), dry)
    allowed = .92 / np.maximum(np.abs(thinned).max(axis=0), .92)
    gain = uniform_filter1d(minimum_filter1d(allowed, size=400), size=400)
    ends = np.minimum(np.minimum(TIME, TIME[-1] - TIME) / .004, 1)
    top_cut = signal.ellip(10, .1, 80, CUTOFF_HZ, fs=SR, output="sos")
    return signal.sosfilt(top_cut, ends * gain * thinned)


dry = scene()
out = record(dry)
persist_wave(out)
```